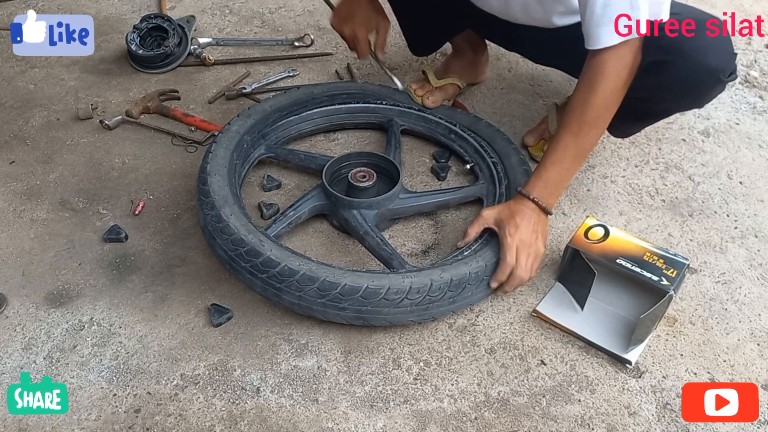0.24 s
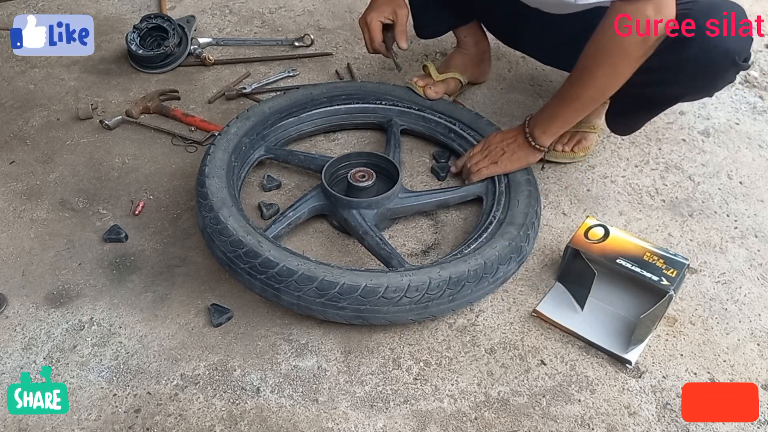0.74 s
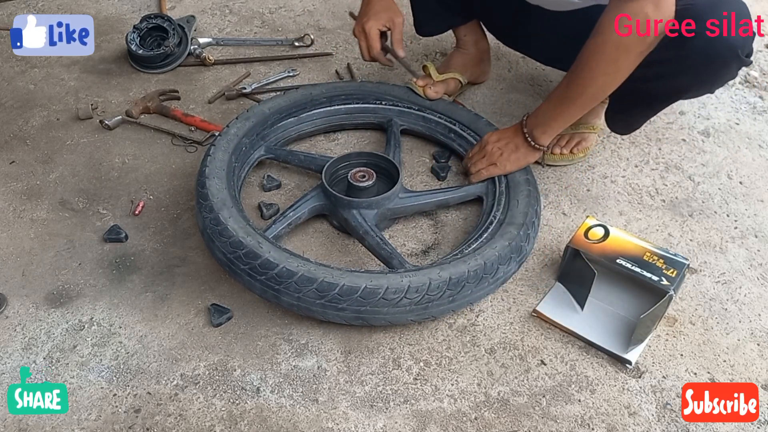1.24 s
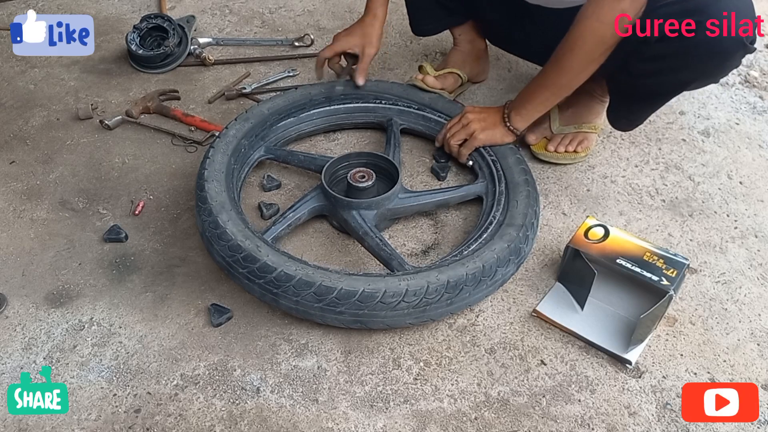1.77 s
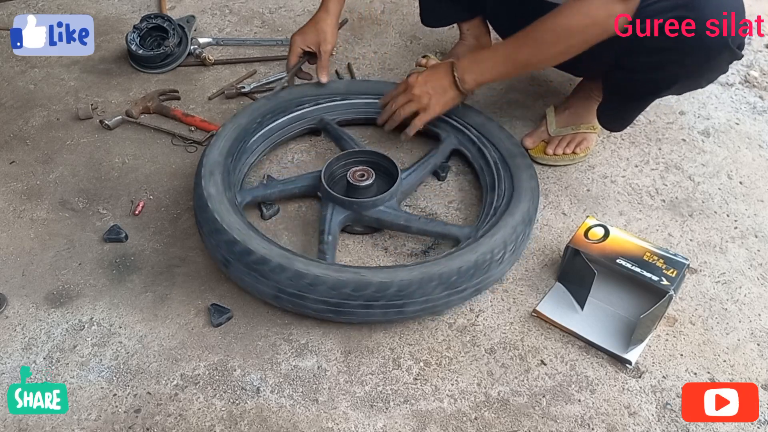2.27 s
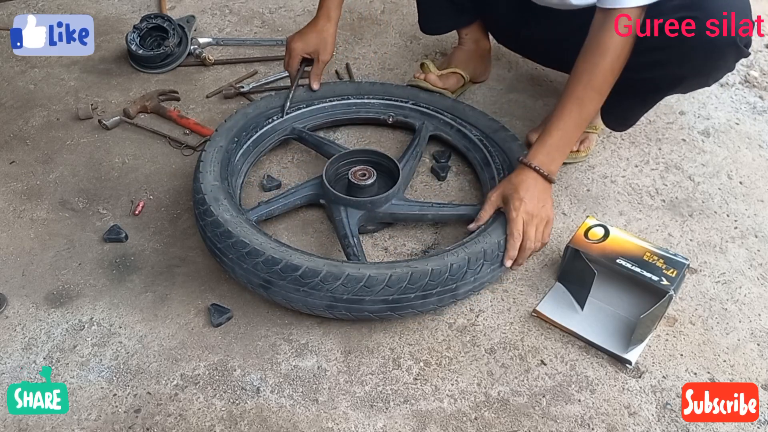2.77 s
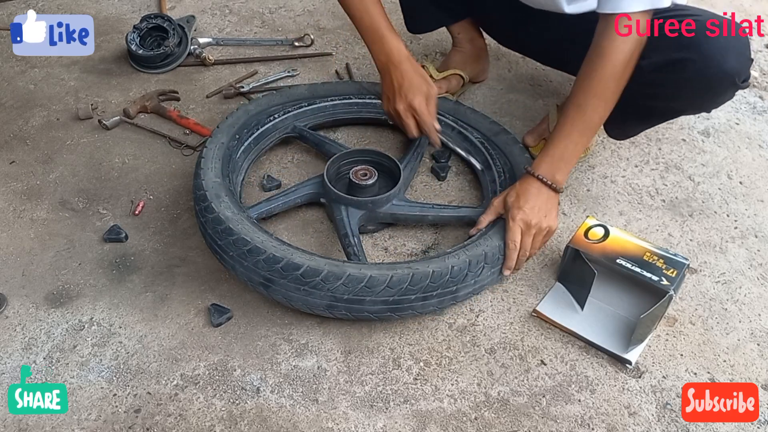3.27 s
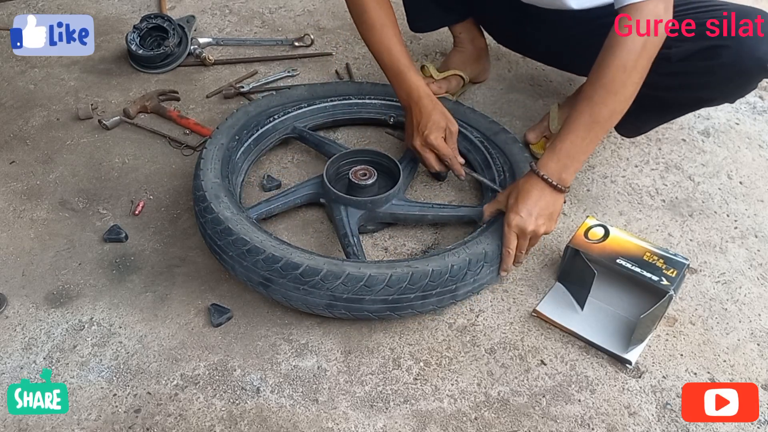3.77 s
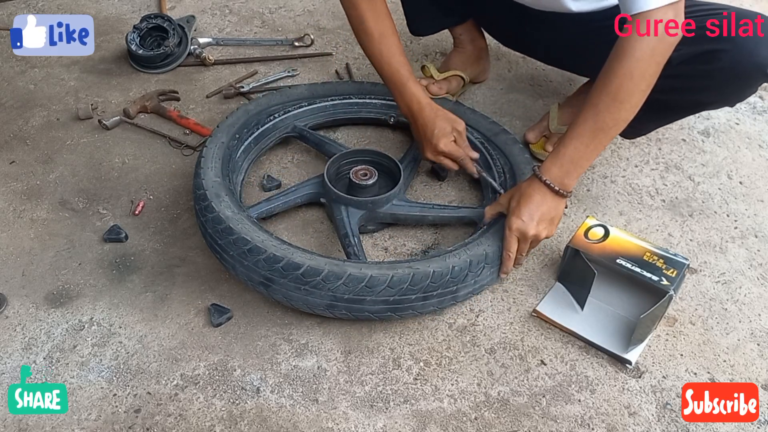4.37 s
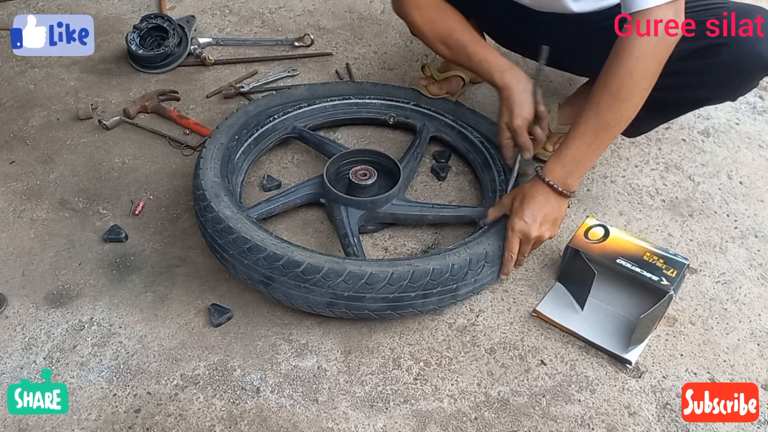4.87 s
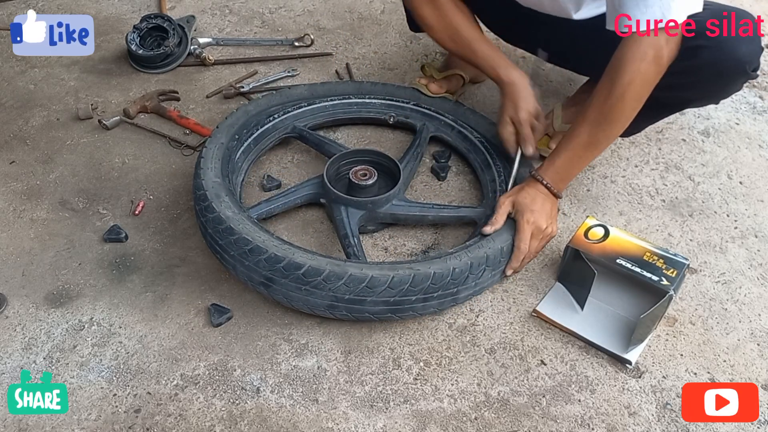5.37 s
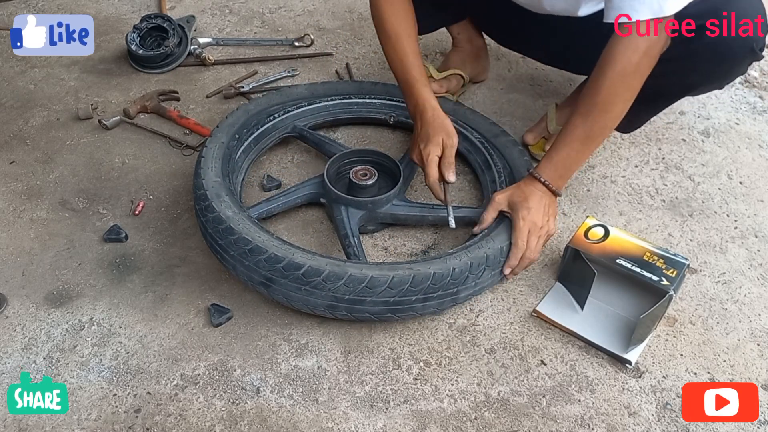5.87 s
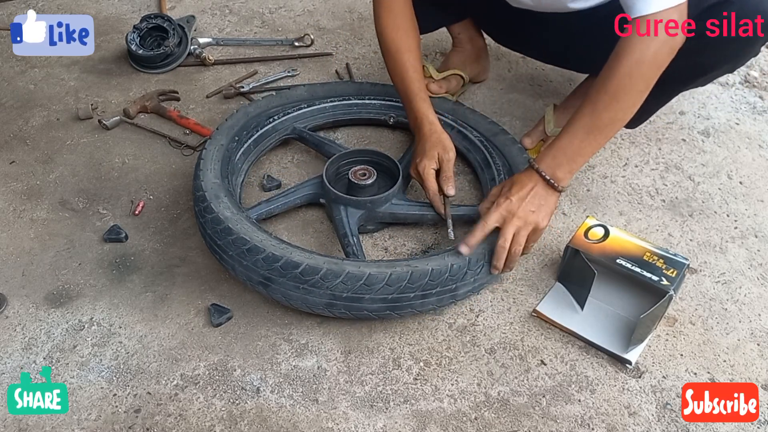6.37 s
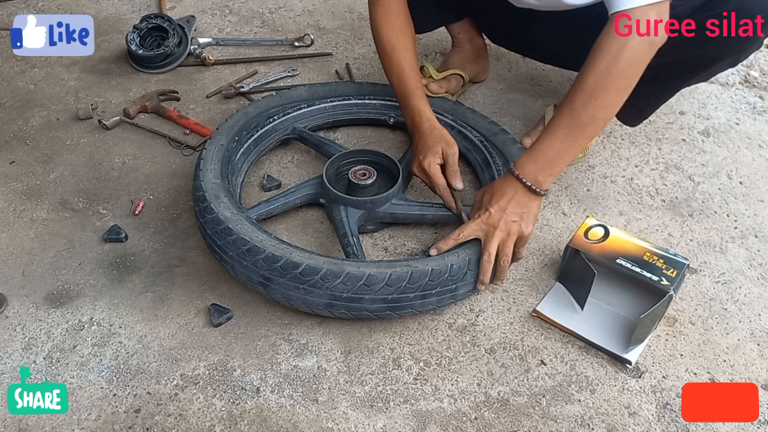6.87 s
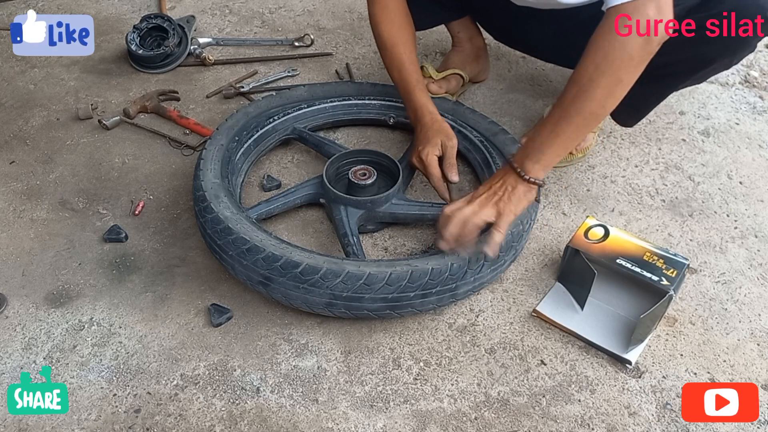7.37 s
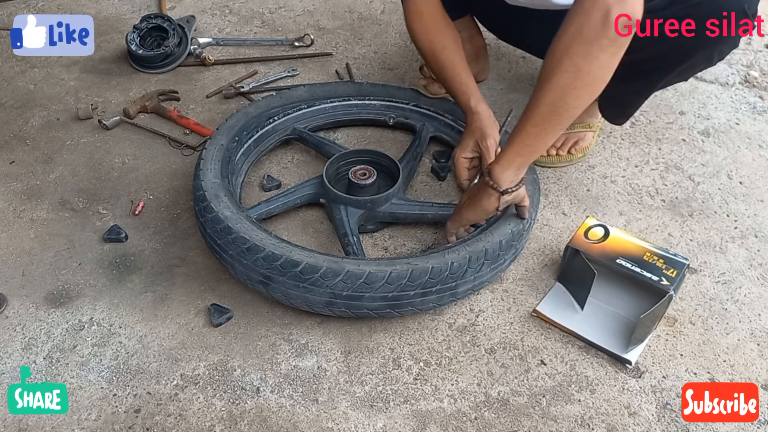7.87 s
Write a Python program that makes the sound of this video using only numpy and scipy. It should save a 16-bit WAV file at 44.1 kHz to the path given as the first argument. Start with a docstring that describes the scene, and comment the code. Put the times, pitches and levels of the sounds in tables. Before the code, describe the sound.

Heard from a metre or two, under a roof with a short hard room tail. Faint tool clink and soft hollow tyre thuds at 0.0-0.4 s. At 1.04 s a steel lever strikes the rim: one very loud, bright, short clank, far above everything else, with a tyre thud beneath. A dull thump at 1.8 s opens a busy cluster from 2.0 to 2.6 s: low rubber knocks, gritty drags, a light spanner scrape and thin ring. Small rim clinks at 3.6-3.9 s, the last clearest. Soft knocks near 4.8-5.0 s, then a moderate metal clink with hollow thud at 5.4 s. From 5.7 s mostly quiet rubber rubbing, finger slides and faint pats, with muted thuds at 7.4 and 7.9 s. Behind: low traffic swells, a fading engine drone, faint high chirps throughout, and a distant machine hum and whirr growing towards the end.

```python
"""A tyre is levered onto a cast alloy wheel on a concrete floor under a roof, a metre or two away.
Steel levers clink on the rim and the hollow tyre thuds: each blow is decaying sine modes plus a noise crack.
Rubber and steel drag and rub as shaped noise; scrapes drive resonances with random slips.
Behind: a reverberant room, far traffic as swelling noise, machine tones with a whirr, far chirps as fuzzy tones."""
import sys
import numpy as np
from scipy import signal
from scipy.fft import rfft, irfft
from scipy.io import wavfile
from scipy.ndimage import uniform_filter1d

SR = 44100
rng = np.random.default_rng(int(sys.argv[2]) if len(sys.argv) > 2 else 0)


def unload_wav(signal):
    """Save mono or channel-first audio to the path in sys.argv[1] as 16-bit WAV at rate SR, clipped to [-1, 1]."""
    wavfile.write(
        sys.argv[1],
        SR,
        np.round(np.clip(np.atleast_2d(signal).T, -1, 1) * 32767).astype(np.int16),
    )


N = 358974

# Blows, by thing struck: start_s, level_db (ringing peak), tilt_db_per_octave, ring_factor (scales t60),
# rise_ms (contact), crack_db (relative to ringing)
LEVER_BLOWS = [(.6, -53, 3.5, 1.4, 1, -0.5), (.789, -52, 1, 0.75, 3.4, -7.5),
               (.941, -48, -8, 2.2, 0.78, -14.5), (1.039, -2.5, 2, 1.08, 3.6, -8),
               (1.059, -20.5, 5.5, 0.37, 3, 0), (1.526, -50, 0, .4, 1.8, -0.5),
               (5.391, -33.5, 3.5, 1.1, 3, 0.5)]
RIM_BLOWS = [(2.45, -43, -12, .6, 2.06, -6), (3.604, -45, -2.5, 0.95, 1.9, 0),
             (3.65, -40, -5, 1.4, 3.3, -8), (3.69, -43.5, -11, 0.52, 5.2, -16),
             (3.861, -29, 2, 1.1, 3.6, -7.5), (5.406, -17.5, 1.5, 1.01, 5.8, -8)]
SPANNER_BLOWS = [(2.325, -51, 12, 0.15, 1.2, 22), (2.51, -37, 0.23, 0.86, 3, -15)]
TYRE_BLOWS = [(.022, -36, 8.5, 0.66, 2.8, -1), (.103, -27, 2.5, 0.44, 1.55, 7),
              (.354, -43.5, 4.5, 0.52, 0.31, 7.5), (.938, -38.5, 7, 0.18, 2.3, -9),
              (1.038, -20.5, 28, 0.46, 0.65, -15), (1.528, -47, 6.5, 1.94, 8.7, -1),
              (1.835, -24.5, 1.5, 0.94, 3.7, -6), (1.967, -43.5, 4, 1.6, 0.46, 4.5),
              (2.094, -41, -17, 0.63, 2.5, -5), (2.216, -35.5, 15, 0.32, 9.1, 6),
              (2.239, -33.5, 5, 0.3, 3.3, 8.5), (2.31, -43, -6, 0.8, 4.5, 12.5),
              (2.33, -38, 7, 0.23, 1.3, -1), (2.371, -36.5, -1, 0.2, 1.3, 5.5),
              (2.386, -30.5, 0.5, 0.29, 4.3, 8), (2.465, -35, 8, 0.44, 3.3, 0),
              (2.57, -42.5, -13, 0.56, 3.3, -4), (3.66, -39, 6.5, 1.35, 10, -2),
              (3.863, -38, 10, 0.65, 2.2, -28), (4.792, -45.5, 4, 1.7, 4.66, -4.5),
              (4.91, -43, 6.5, 1.9, 10.8, -4), (5.006, -34, -5.5, 1.5, 3.6, -1.5),
              (5.366, -29, 6, 1.6, 14, -3), (5.413, -23, 5, 0.94, 6.5, -10.5),
              (5.582, -43.5, 4, 0.77, 4.6, -15), (7.436, -38.5, -5.5, 0.97, 10.6, -16.5),
              (7.855, -41.5, -15, 0.27, 4.7, -11)]
# Hand on the sidewall; loose tools touching; small steel part: columns as for blows
PAT_BLOWS = [(4.846, -40.5, -0.5, 0.89, 8.5, -3), (6.29, -49, 0.24, 0.64, 10.6, 9),
             (6.655, -45.5, .3, 0.76, 4, 6)]
TOOL_BLOWS = [(.021, -36, 0.3, 2.1, 0.98, -7.5)]
BOLT_BLOWS = [(1.975, -44, 0, 1, 5.5, -20)]
# Ringing modes, by thing struck: mode_hz, relative_db, t60_s (before ring_factor)
LEVER_MODES = [(1090, 6, .04), (1078, -17, .3), (1595, -14, .08), (1955, -15, .11), (2110, -11.5, .4),
               (2150, -16, .05), (2840, -16, .09), (3075, -7, .06), (3180, -15, .08), (3340, -1, .05),
               (3430, -16, .08), (3645, -13, .06), (3900, -12, .07), (4125, -15, .1), (4415, -21, .07),
               (4820, -19, .05), (5680, -22, .05), (6150, -24, .15), (6670, -22, .1), (8940, -25, .14),
               (10200, -29, .07), (11100, -28, .07), (12450, -29, .13), (13970, -31, .07)]
RIM_MODES = [(770, -14, .1), (1080, -13, .07), (1306, 2, .065), (1350, -10, .08), (1960, -14, .12),
             (2132, -18, .12), (2476, -14, .09), (2514, -6.5, .16), (2555, -12, .14), (3160, -8, .1),
             (3350, -8, .06), (3585, -18, .12), (3925, -10, .15), (4124, -20, .13), (4445, -6, .14),
             (4597, -20, .12), (4780, -20, .14), (5320, -19, .07), (5420, -9, .06), (5540, -15, .1),
             (6708, -18, .08), (6870, -16, .1), (7590, -22, .12), (8360, -24, .1), (9100, -17, .12),
             (10320, -18, .1), (12250, -15, .11), (12700, -16, .08)]
SPANNER_MODES = [(1222, -8, .25), (2210, -12, .3), (3655, -8, .45), (4640, -14, .25), (5300, -16, .25),
                 (5997, 0, 1.1), (6160, -6, .45), (7822, -11, .2), (8791, -16, .35), (10900, -18, .25),
                 (11800, -16, .25), (14140, -18, .3)]
TYRE_MODES = [(230, -11, .15), (276, 4, .14), (325, -5, .07), (385, -7, .06), (460, -13, .09)]
SIDEWALL_MODES = [(463, -4, 0.11), (524, -2.5, 0.065), (626, -14.5, 0.14), (703, -3.5, 0.049)]
TOOL_MODES = [(1930, -11, .1), (3690, -2, .14), (5370, -12, .09), (5895, -5, .2), (6930, -14, .06),
              (8410, -11, .04), (12010, -16, .12), (14140, -16, .15)]
BOLT_MODES = [(5340, -2.5, 0.32), (6400, -4, .06), (11140, -3, .25), (12000, -5, .14), (12600, -7, .2)]
# Spanner modes while in contact: mode_hz, relative_db
SCRAPED_SPANNER_MODES = [(2210, 3.5), (3640, -3), (4640, 1), (5200, -11), (6000, -2), (8640, -11.5),
                         (10900, -14), (11800, -1.5), (14100, -13)]
# Contact crack spectra: freq_hz, relative_db
METAL_CRACK = [(120, -37), (200, -19.5), (390, -13), (800, -21.5), (1150, -16.5), (1770, -21),
               (2330, -13.5), (3200, -13), (4800, -22.5), (7970, -35), (16000, -32)]
RUBBER_CRACK = [(88, -34), (150, -16), (321, 3), (1360, -11.5), (1760, -27), (1940, -21.5), (3700, -23),
                (4320, -33.5), (16000, -52)]
# Spanner along the rim; lever chattering on the rim: start_s, length_s, level_db
SPANNER_SCRAPES = [(2.297, 0.29, -55.5)]
RIM_SCRAPES = [(2.44, 0.12, -54), (3.605, 0.14, -62.5)]
# Rubber and steel over rim and concrete; bead over rim; fingers on tread:
# start_s, length_s, level_db, tilt_db_per_octave
DRAGS = [(.76, 0.2, -69, 2), (1.51, 0.69, -66.5, 3), (1.96, 0.14, -46.5, -1.5), (2.06, 0.54, -53.5, 0.5),
         (2.214, 0.066, -42.5, -2.5), (2.3, 0.25, -45, -0.5), (2.44, 0.13, -44, -0.7), (2.5, 0.062, -57, 1),
         (2.7, 0.49, -64.5, 2), (3.6, 0.21, -58.5, -2)]
BEAD_RUBS = [(4.58, 0.35, -63, 0.0066), (4.9, 0.5, -63, 0.0064), (5.72, 0.19, -71.5, 0.02),
             (6.24, 0.13, -61, 0.0066), (6.42, 0.5, -53.5, 0.01), (6.65, 0.51, -60, 0.0083)]
FINGER_SLIDES = [(1.38, 0.23, -60.5, 0.025), (3.1, 0.72, -63.5, 0.0008), (4.93, 0.38, -66, 0.0034),
                 (5.74, .13, -64.5, 0.0071), (6.2, 1, -59, 0), (6.7, 0.86, -62, 0),
                 (7.24, 0.2, -60, 0.0062)]
# Friction spectra, same order: freq_hz, relative_db
DRAG_SPECTRUM = [(180, -29), (300, 0), (603, -17), (2170, -12), (2610, -18), (4300, -16.5), (4670, -18),
                 (6200, -23.5), (7440, -32.5), (11700, -23), (16000, -28.5)]
BEAD_SPECTRUM = [(410, 8.5), (700, -16), (985, -30), (1870, 7), (3300, -2.5), (3790, 2.5), (7920, -20),
                 (9000, -6), (11700, -42), (19800, -120)]
FINGER_SPECTRUM = [(2500, -5), (5000, 1.5), (8000, -12.5), (11000, -4.5), (14300, -4.5), (16000, -7)]
# Stroke envelopes: swell_share (0-1 of length), end_db (relative to top)
DRAG_SHAPE = (0.033, -10.5)
BEAD_SHAPE = (0.46, -15.5)
FINGER_SHAPE = (0.28, -13.5)
SCRAPE_SHAPE = (0.094, -15)
# Likeness of near sounds at the two microphone ports: freq_hz, likeness (0-1)
PORT_LIKENESS = [(300, 0.91), (1300, 0.92), (2500, 0.36), (8000, 0.26)]
# Room decay: freq_hz, t60_s
ROOM_DECAY = [(200, .3), (1000, .26), (3000, .36), (8000, .28), (15000, .24)]
# Yard wash spectrum: freq_hz, relative_db
YARD_SPECTRUM = [(24, -43.5), (40, -21), (81, 1), (167, -8.5), (290, -3), (600, -25), (1180, -29.5),
                 (1900, -23.5), (3140, -32.5), (3650, -15.5), (3930, -23), (7730, -37.5), (8770, -32),
                 (14800, -35.5), (16000, -39)]
# Yard left-right likeness: freq_hz, likeness (-1 to 1)
YARD_LIKENESS = [(60, 0.81), (180, 0.92), (550, 0.017), (1650, -0.37), (4970, -0.4), (15000, -0.66)]
# Yard left-right balance: freq_hz, left_over_right_db
YARD_BALANCE = [(60, -1), (180, -2.5), (550, -1), (1650, -4), (4970, -2), (15000, -1.5)]
# Vehicles passing, as bass swells: peak_s, swell_db, half_length_s (to 1/e of swell_db)
TRAFFIC = [(0, 9.5, 0.25), (2.404, 6.5, .25), (4.872, 9, 0.33), (5.61, 14, 0.24), (6.61, 3.5, 0.3),
           (8.14, 5, 0.25)]
# Far machine, its second tone, far idling engine: time_s, level_db (rms)
MACHINE_LEVEL = [(0, -84), (3, -68.5), (5.5, -66), (6.5, -59.5), (8.14, -56.5)]
UPPER_LEVEL = [(5.5, -72.5), (6.5, -63), (8.14, -65)]
ENGINE_LEVEL = [(0, -65.5), (8.14, -72.5)]
# Clearest far chirps: start_s, level_db, pitch_hz, glide_hz (heard from about -1 to +1 times this about pitch)
CHIRPS = [(.44, -66, 3630, 0), (.767, -62.5, 3500, -20), (1.83, -65, 3790, -20), (2.91, -67, 3590, 30),
          (3.147, -63, 3410, -20), (3.46, -68, 3650, 50), (3.71, -64, 3740, -30), (3.76, -67, 3590, -30),
          (4.3, -66, 3770, 20), (4.47, -68, 3520, -30), (4.7, -68, 3385, 0), (5.045, -64, 3520, 50),
          (5.17, -67, 3700, -40), (5.759, -63, 3425, 30), (5.78, -68, 3630, -30), (6.28, -68, 3470, -10),
          (6.4, -58, 3790, -20), (6.47, -66, 3470, 10), (6.74, -64, 3770, -20), (6.94, -70, 1900, -20),
          (6.96, -68, 3470, 0), (7.613, -64, 3530, 50), (7.76, -67, 3390, -20), (8.0, -65, 3660, -40)]

METAL_CRACK_T60_S, RUBBER_CRACK_T60_S = 0.045, 0.016
WASH_DB, WASH_T60_S = -18, 0.58  # blur of many small modes: relative to crack; t60 before ring_factor
CHATTER_DB, CHATTER_S = 5.5, 0.012  # loose contact wavers each mode: depth before chatter_share; smoothing
GRIP_S, GRIP_DB = 0.128, -18  # hand closes on the lever this long after a blow and damps it
SLIPS_PER_S, SLIP_SPREAD_DB = 260, 0.5
YARD_DB = -54.5
MACHINE_HZ, UPPER_HZ, ENGINE_HZ = 312, 356, 94.8
WHIRR_HZ, WHIRR_OCTAVES, WHIRR_DB = 486.8, 0.26, -9  # centre; band scale; relative to machine tone
CHIRP_S = 0.16
FAINT_PER_S, FAINT_DB, FAINT_SPREAD_HZ = 1.6, -71.5, 76  # fainter chirps at random
CHORUS_HZ, CHORUS_DB = 3590, -76.5  # more chirps, further off
TOP_CUT_HZ = 15800


def gain_of(db):
    """dB to amplitude factor."""
    return 10 ** (np.asarray(db) / 20)


def evened(x):
    """Scales to rms 1."""
    return x / np.sqrt(np.mean(x ** 2) + 1e-20)


def read(points, hz):
    """Table values at hz, interpolated over log frequency."""
    freq_hz, value = np.transpose(points)
    return np.interp(np.log(hz + 1), np.log(freq_hz + 1), value)


def level_curve(rows):
    """Level in dB at every sample."""
    time_s, level_db = np.transpose(rows)
    return np.interp(np.arange(N) / SR, time_s, level_db)


def sides(x, pan_db):
    """Sets the left-over-right balance."""
    return x * gain_of([[pan_db / 2], [-pan_db / 2]])


def patches(shape, bins, frames):
    """Random blotches over frequency and time, rms 1."""
    grid = rng.standard_normal(shape[::-1]).T
    return evened(uniform_filter1d(uniform_filter1d(grid, bins, 0), frames, 1))


def partner(first, second, likeness):
    """Mixes two independent signals into one with the given likeness to the first."""
    return likeness * first + np.sqrt(1 - likeness ** 2) * second


def noise(field_db, likeness, size):
    """Two-channel noise shaped by a frequency x time field in dB."""
    a, b, c, d = rng.standard_normal(field_db.shape[::-1] + (4,)).T
    left = a + 1j * b
    z = np.array([left, partner(left, c + 1j * d, likeness)]) * gain_of(field_db)
    return signal.istft(z, nperseg=size, noverlap=size * 3 // 4)[1][:, :N]


def resonate(x, hz, width_hz):
    """Resonance of gain 1: shifts the curve hz to zero, smooths, shifts back."""
    turn = np.exp(2j * np.pi * np.cumsum(hz) / SR)
    r = np.exp(-np.pi * width_hz / SR)
    return 2 * (turn * signal.lfilter([1 - r], [1, -r], x / turn)).real


def stroke(t, start_s, length_s, level_db, shape):
    """Level in dB of one stroke: a swell, then a fade that quickens."""
    share, end_db = np.clip(shape[0], .02, .9), shape[1]
    u = (t - start_s) / max(length_s, .02)
    swell_db = 20 * np.log10(np.sin(np.pi / 2 * np.clip(u / share, 0, 1)) ** 2 + 1e-6)
    return level_db + swell_db + end_db * (np.maximum(u - share, 0) / (1 - share)) ** 2


def ringing(t, modes, tilt_db, ring, grip, chatter_share):
    """Decaying sine modes that waver in loose contact; high modes reach the ports out of step."""
    hz, mode_db, t60_s = np.transpose(modes)[:, :, None]
    level_db = mode_db + tilt_db * np.log2(hz / 1000) - 60 * t / (t60_s * ring)
    waver = patches((len(hz), SR // 100), 1, round(CHATTER_S * SR / 100)).repeat(100, axis=1)
    waver_db = chatter_share * CHATTER_DB * uniform_filter1d(waver, size=100, axis=1)
    fade = gain_of(level_db) * gain_of(waver_db) * grip
    phase = 2 * np.pi * (hz * t + rng.random(hz.shape))
    apart = np.arccos(np.clip(read(PORT_LIKENESS, hz), 0, 1))
    return np.array([(fade * np.sin(phase)).sum(0), (fade * np.sin(phase + apart)).sum(0)])


def contact_noise(crack, tilt_db, thicket_db):
    """Crack-coloured noise with random spectral peaks: a thicket of small modes."""
    hz = np.fft.rfftfreq(SR, 1 / SR)
    colour = gain_of(read(crack, hz) + tilt_db * np.log2((hz + 50) / 1000))
    peaks = gain_of(thicket_db * patches((1, len(hz)), 1, 40)[0])
    a, b = rfft(rng.standard_normal((2, SR))) * colour * peaks
    likeness = np.clip(read(PORT_LIKENESS, hz), 0, 1)
    return evened(irfft([a, partner(a, b, likeness)]))


def blows(events, modes, crack, crack_t60_s, pan_db, thicket_db=5.0, chatter_share=1, grip_db=0, grip_s=GRIP_S):
    """Each blow rings the modes and adds a short crack with a longer wash."""
    out, t = np.zeros((2, N + SR)), np.arange(SR) / SR
    grip = gain_of(grip_db * np.clip((t - grip_s) / .012, 0, 1))
    for start_s, level_db, tilt_db, ring_factor, rise_ms, crack_db in events:
        ring = max(ring_factor, .05)
        rise = 1 - np.exp(-(t * 1000 / max(rise_ms, .1)) ** 2)
        hit = ringing(t, modes, tilt_db, ring, grip, chatter_share) * rise
        hit /= abs(hit).max()
        crack_fade = gain_of(-60 * t / crack_t60_s)
        wash_fade = np.sqrt(grip) * gain_of(WASH_DB - 60 * t / (WASH_T60_S * ring))
        burst = contact_noise(crack, tilt_db, thicket_db)
        hit += gain_of(crack_db) * (crack_fade + wash_fade) * burst * rise
        out[:, round(start_s * SR):][:, :SR] += gain_of(level_db) * sides(hit, pan_db)
    return out[:, :N]


def metal_blows(events, modes, pan_db, **settings):
    """Blows with the hard crack of metal contact."""
    return blows(events, modes, METAL_CRACK, METAL_CRACK_T60_S, pan_db, **settings)


def rubber_blows(events, modes, pan_db, **settings):
    """Blows with the short low crack of rubber contact."""
    return blows(events, modes, RUBBER_CRACK, RUBBER_CRACK_T60_S, pan_db, **settings)


def scraping(strokes, modes, width_hz):
    """Uneven slips keep contact-damped modes alive; each slip favours other modes."""
    out = np.zeros((2, N))
    for start_s, length_s, level_db in strokes:
        t = np.arange(start_s, start_s + 1.2 * length_s, 1 / SR)
        when, size = rng.random((len(t), 2)).T
        slips = (when < SLIPS_PER_S / SR) * gain_of(-SLIP_SPREAD_DB * np.log(size + 0.018))
        sung = np.zeros((2, len(t)))
        for hz, mode_db, *_ in modes:
            share, grit = rng.standard_normal(len(t)), rng.standard_normal((2, len(t)))
            drive = slips * share + 0.1 * grit
            sung += gain_of(mode_db) * evened(resonate(drive, np.full(len(t), hz), width_hz))
        envelope = gain_of(stroke(t, start_s, length_s, level_db, SCRAPE_SHAPE))
        out[:, round(start_s * SR):][:, :len(t)] += envelope * sung
    return out


def wheel_and_tools():
    """Rim, levers, spanner and small steel parts ring when struck or scraped."""
    metal = metal_blows(RIM_BLOWS, RIM_MODES, -1.1, chatter_share=0.87)
    metal += metal_blows(LEVER_BLOWS, LEVER_MODES, -.7, chatter_share=0.52, grip_db=GRIP_DB)
    metal += metal_blows(SPANNER_BLOWS, SPANNER_MODES, -1.3, chatter_share=0)
    metal += scraping(SPANNER_SCRAPES, SCRAPED_SPANNER_MODES, 27)
    metal += scraping(RIM_SCRAPES, RIM_MODES, 34)
    metal += metal_blows(TOOL_BLOWS, TOOL_MODES, -2.5, grip_db=-13, grip_s=0.074)  # stopped by next thud
    return metal + metal_blows(BOLT_BLOWS, BOLT_MODES, -2.3)


def tyre_thuds():
    """The hollow tyre booms in a few low modes; hand pats ring the sidewall."""
    thuds = rubber_blows(TYRE_BLOWS, TYRE_MODES, -0.79, thicket_db=2.0, chatter_share=0.81)
    return thuds + rubber_blows(PAT_BLOWS, SIDEWALL_MODES, -2.2, thicket_db=14.0)


def rubbing(strokes, shape, spectrum, lumpy_db, patchy_db):
    """Friction noise in strokes; random slips lift all bands at once."""
    hz, t = np.fft.rfftfreq(256, 1 / SR), np.arange(N // 64 + 5) * 64 / SR
    colour_db = read(spectrum, hz)[:, None]
    colour_db = colour_db - 10 * np.log10(np.sum(gain_of(2 * colour_db)))
    octaves = np.log2((hz[:, None] + 50) / 1500)
    power = 0
    for start_s, length_s, level_db, tilt_db in strokes:
        envelope_db = stroke(t, start_s, length_s, level_db, shape)
        power = power + gain_of(2 * envelope_db) * gain_of(2 * tilt_db * octaves)
    field_db = colour_db + 10 * np.log10(power + 1e-20)
    bursts = np.minimum(rng.exponential(1, len(t)), 3) ** 2 - 2
    field_db = field_db + lumpy_db * uniform_filter1d(bursts, size=3) / 3
    field_db = field_db + patchy_db * patches(field_db.shape, 4, 12)
    likeness = np.clip(read(PORT_LIKENESS, hz), 0, 1)[:, None]
    return sides(noise(field_db, likeness, 256), -2.5)


def friction():
    """Drags, the bead rubbing over the rim, fingers sliding on the tread."""
    rubs = rubbing(DRAGS, DRAG_SHAPE, DRAG_SPECTRUM, 4.2, 3.1)
    rubs += rubbing(BEAD_RUBS, BEAD_SHAPE, BEAD_SPECTRUM, 0.33, 2.7)
    return rubs + rubbing(FINGER_SLIDES, FINGER_SHAPE, FINGER_SPECTRUM, 0.58, 0.49)


def room(x):
    """Random-sign taps, one in every 20 samples; each band dies at its own speed."""
    taps = np.zeros((2, SR // 2))
    at = np.arange(300, SR // 2 - 20, 20) + rng.integers(0, 20, (2, (SR // 2 - 301) // 20))
    np.put_along_axis(taps, at, rng.choice([-1., 1.], at.shape), 1)
    hz, t, z = signal.stft(taps, SR, nperseg=256)
    # bass reaches both ports alike
    likeness = np.clip(read([(300, 1.0), (2000, 0.13), (8000, 0.42)], hz), 0, 1)[:, None]
    z[1] = partner(z[0], z[1], likeness)
    fade = gain_of(-60 * t / read(ROOM_DECAY, hz)[:, None])
    tail = signal.istft(z * fade, SR, nperseg=256)[1]
    return signal.fftconvolve(x, tail / np.linalg.norm(tail[0]), axes=1)[:, :N]


def yard():
    """Steady outdoor wash with drifting patches; traffic swells the bass."""
    hz, t = np.fft.rfftfreq(1024, 1 / SR), np.arange(N // 256 + 5) * 256 / SR
    swell_db = sum(db * np.exp(-((t - peak_s) / half_s) ** 2) for peak_s, db, half_s in TRAFFIC)
    bass = 1 / (1 + (hz[:, None] / 170) ** 4)
    field_db = read(YARD_SPECTRUM, hz)[:, None] + bass * (swell_db - 3.5)
    field_db = field_db + 1.2 * patches(field_db.shape, 10, 14)
    wash = noise(field_db, np.clip(read(YARD_LIKENESS, hz), -1, 1)[:, None], 1024)
    balance = gain_of(read(YARD_BALANCE, np.fft.rfftfreq(N, 1 / SR)) / 2)
    return gain_of(YARD_DB) * evened(irfft(rfft(wash) * [balance, 1 / balance], N))


def hum(hz, rows):
    """A steady-pitched tone that wavers a little in level; late starters fade in over 0.2 s."""
    t, first_s = np.arange(N) / SR, rows[0][0]
    waver = 1 + 0.18 * evened(uniform_filter1d(rng.standard_normal(N), 3000))
    begun = np.clip((t - first_s) / 0.2 + (first_s < .1), 0, 1)
    tone = np.sqrt(2) * np.sin(2 * np.pi * hz * t)
    return sides(gain_of(level_curve(rows)) * waver * begun * tone, -7.5)


def whirr():
    """A soft noise band that follows the machine tone's level curve."""
    hz = np.fft.rfftfreq(1024, 1 / SR)[:, None]
    band_db = -3 * (np.log2((hz + 1) / WHIRR_HZ) / WHIRR_OCTAVES) ** 2
    field_db = band_db + 6.3 * patches((513, N // 256 + 5), 3, 10)
    band = evened(noise(field_db, 0.21, 1024))
    return gain_of(level_curve(MACHINE_LEVEL) + WHIRR_DB) * sides(band, -5.0)


def far_machines():
    """An idling engine's drone and a machine's two tones with its whirr."""
    tones = hum(ENGINE_HZ, ENGINE_LEVEL) + hum(MACHINE_HZ, MACHINE_LEVEL) + hum(UPPER_HZ, UPPER_LEVEL)
    return tones + whirr()


def chirping():
    """Each chirp is narrow noise on a gliding pitch; a blotchy band holds the far chorus."""
    out = np.zeros((2, N + SR))
    n, end_s = round(CHIRP_S * SR), N / SR
    when, loud = rng.random((round(FAINT_PER_S * end_s), 2)).T
    faint_hz = CHORUS_HZ + FAINT_SPREAD_HZ * rng.standard_normal(len(when))
    faint = zip(when * end_s, FAINT_DB + 6 * (loud - .5), faint_hz, 0 * when)
    envelope = np.sin(np.pi * np.linspace(0, 1, n) ** 0.54)
    for start_s, level_db, pitch_hz, glide_hz in [*CHIRPS, *faint]:
        glide = pitch_hz + glide_hz * np.linspace(-1.6, 1, n + 2000)
        fuzz = resonate(rng.standard_normal(n + 2000), glide, 12)[2000:]  # drop the resonator's build-up
        chirp = sides(evened(fuzz) * envelope, 3)
        out[:, round(start_s * SR):][:, :n] += gain_of(level_db) * chirp
    hz = np.fft.rfftfreq(1024, 1 / SR)[:, None]
    field_db = -3 * ((hz - CHORUS_HZ) / 130) ** 2 + 9.1 * patches((513, N // 256 + 5), 2, 16)
    return out[:, :N] + gain_of(CHORUS_DB) * evened(noise(field_db, 0.23, 1024))


def scene():
    """Struck things in the room, rubbing, and the yard behind."""
    metal, tyre = wheel_and_tools(), tyre_thuds()
    wet = gain_of(-10) * room(metal) + gain_of(-8) * room(tyre)
    return metal + tyre + wet + friction() + yard() + far_machines() + chirping()


def record(dry):
    """The recorder cuts the deep bass and the top."""
    dry = signal.sosfilt(signal.butter(4, 58, "high", fs=SR, output="sos"), dry)
    top_cut = signal.firwin(511, TOP_CUT_HZ, window=("kaiser", 9), fs=SR)
    return signal.oaconvolve(dry, top_cut[None], "same")


dry = scene()
out = record(dry)
unload_wav(out)
```